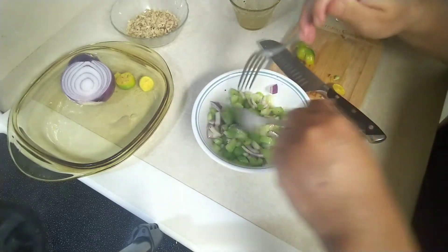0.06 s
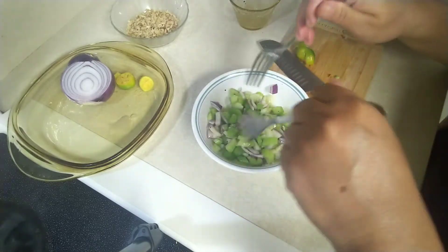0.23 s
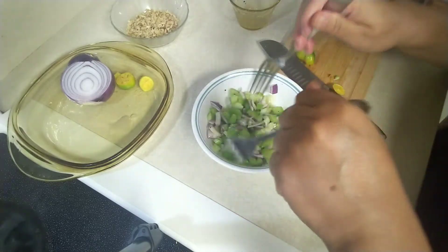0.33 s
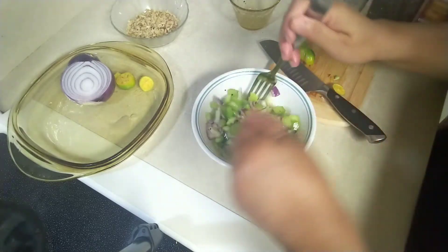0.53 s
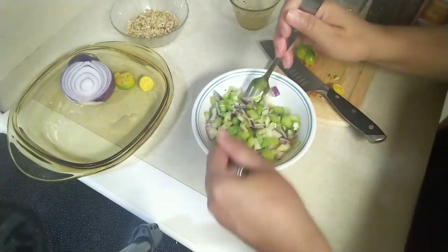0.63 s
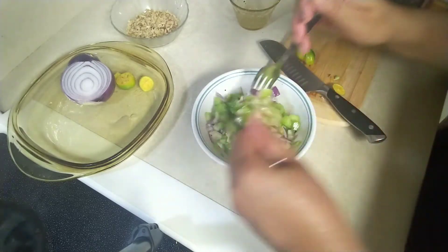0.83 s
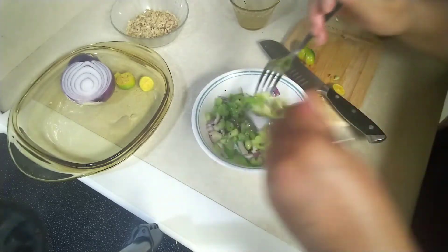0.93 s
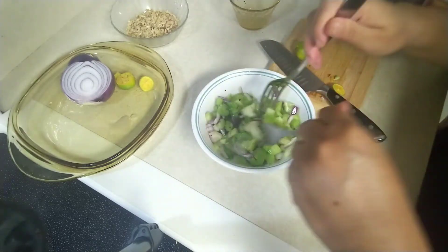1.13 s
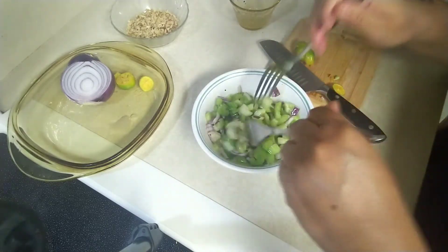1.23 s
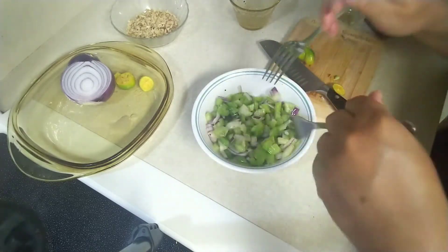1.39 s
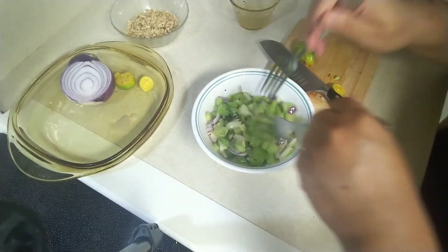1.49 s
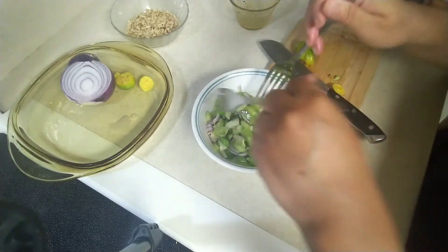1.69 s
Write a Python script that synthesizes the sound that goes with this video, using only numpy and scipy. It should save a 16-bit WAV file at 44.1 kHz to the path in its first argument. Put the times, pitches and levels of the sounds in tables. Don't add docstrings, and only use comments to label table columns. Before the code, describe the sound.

A metal fork tosses chopped vegetables in a ceramic bowl: three quick bright clinks with a brief scrape, then quieter ticks and soft bumps, and one last lighter clink; small kitchen, close stereo microphones, low hum and hiss.

```python
import sys
import numpy as np
from scipy import signal
from scipy.fft import rfft, irfft, next_fast_len
from scipy.io import wavfile
from scipy.ndimage import uniform_filter1d

SR = 44100
rng = np.random.default_rng(int(sys.argv[2]) if len(sys.argv) > 2 else 0)


def rack_gain(trim_db):
    fader = np.asarray(trim_db, float)
    return 10 ** (fader / 20)


def transcribe(u):
    v = np.clip(np.atleast_2d(u).T, -1, 1)
    q = np.round(v * 32767).astype(np.int16)
    wavfile.write(sys.argv[1], SR, q)


N = 77175


def clinks():
    # t/s, peak level/dB, rattle level/dB, rattle length [factor]
    clink_table = [
        (0.231, -9, -8, 0.66),
        (.399, -3, -8.5, 1.4),
        (.4985, -11.5, -11.5, 0.38),
        (1.5044, -15.5, -8.5, 0.62),
    ]
    # f/Hz, level/dB per Hz
    rattle_colour = [(410, -60.5), (700, -41), (1770, -34), (2590, -20), (2840, -34.5), (5400, -11.5),
                     (6480, -11), (9990, -7), (16000, -23)]
    # f/Hz, level/dB, t60/s
    wall_modes = [(1752, -23.5, 0.12), (3258, -22.5, 0.31), (4404, -28, .07), (5430, -11.5, 0.15),
                  (7370, -10, .09), (8450, -26, .1), (10080, 9, .039), (10480, -13, .035),
                  (11780, -8, 0.059), (12090, -21, .15), (12410, 5.5, 0.063), (13160, -13.5, .12),
                  (14200, -14.5, .1), (15360, 0, 0.26)]
    floor_modes = [(1809, -11, 0.21), (2821, -14.5, 0.13), (3253, -13, .14), (5240, -8.5, .06),
                   (7460, -6.5, 0.11), (8180, -14, 0.095), (9800, -7, 0.14), (10330, -1.5, .07),
                   (10560, -2, 0.042), (10740, -1.5, .08), (12160, -3, .08), (12210, -3, 0.069),
                   (12690, -4, 0.23), (15450, -7.5, 0.19)]
    glance_modes = [(4720, -20, 0.065), (6990, -22, 0.082), (7757, -14, 0.046), (8930, -6, 0.059),
                    (10100, -14, 0.066), (10570, -15, 0.065), (11800, -2, .04), (13050, 1, 0.063),
                    (14500, -12, .08), (14630, -7, .1)]
    rim_modes = [(1791, -13, 0.17), (2827, -12.5, 0.094), (4420, -18.5, 0.03), (5216, -7.5, 0.05),
                 (7368, -1.5, 0.064), (8650, -5, 0.034), (9760, -4, 0.051), (10030, 3.5, 0.027),
                 (10740, -2, 0.076), (11660, 0.5, 0.043), (12500, 0.5, 0.056), (13300, -21, .1),
                 (15100, -8, 0.053), (14680, -5, 0.1)]
    # t/s later, level/dB
    later_tines = [
        [(.003, 3.5), (.0085, -4.5), (.0215, -20)],
        [(.0038, -6), (.0072, -1), (.021, -9.5), (.0365, -13), (.062, -23.5)],
        [(.0033, -3), (.0075, -1.5), (.017, -14.5)],
        [(.003, 0.5), (.008, -4.5), (.019, -10.5)],
    ]
    graze_s, graze_db = .003, -25.5
    split, split_db, split_t60 = .02, -8, .7
    rattle_t60, scatter_db = .092, 6

    out = np.zeros((2, N))
    swarm_hz = rng.uniform(np.sqrt(1400), np.sqrt(15600), size=100) ** 2
    places = (wall_modes, floor_modes, glance_modes, rim_modes)
    for modes, (s, db, rattle_db, length), later in zip(places, clink_table, later_tines):
        main_hz, main_db, main_t60 = np.transpose(modes)
        split_hz = np.repeat(main_hz, 3) * (1 + split * rng.standard_normal(3 * len(modes)))
        swarm_t60 = length * rattle_t60 * rng.uniform(.5, 1.5, len(swarm_hz))
        hz = np.r_[split_hz, swarm_hz]
        t60 = np.r_[split_t60 * np.repeat(main_t60, 3), swarm_t60]
        level = np.r_[np.repeat(main_db, 3) + split_db, along(rattle_colour, swarm_hz) + rattle_db]
        first = [(-graze_s, graze_db), (0, 0)]
        for contacts in (first + list(later[1::2]), later[::2]):
            scatter = scatter_db * rng.standard_normal(len(hz))
            dense = ring(hz, level + scatter + db - 14, t60, .00043, apart(hz))
            bell = ring(main_hz, main_db + db - 15, main_t60, .0003, apart(main_hz), wander=.0000015)
            clink = room(dense + bell)
            for late, loss_db in contacts:
                add(out, s + late, rack_gain(loss_db) * clink)
    return out


def apart(hz):
    return 2.165 * np.clip(hz / 6000, 0, 1)


def ring(hz, db, t60, attack, spread, wander=0):
    t = np.arange(SR // 4) / SR
    lag = 5
    turn = np.c_[spread * rng.uniform(-1, 1, len(hz)) - np.pi * hz * lag / SR]
    shape = rack_gain(np.c_[db] - 60 * t / np.c_[t60]) * (1 - np.exp(-t / attack))
    phase = 2 * np.pi * np.c_[hz] * t
    if wander:
        drift = np.cumsum(rng.standard_normal(phase.shape), axis=1)
        phase = phase + wander * np.c_[hz] * drift
    return np.array([(shape * np.sin(phase + side * turn)).sum(0) for side in (1, -1)])


def scrapes():
    # t/s, rise/s, hold/s, fall/s, level/dB
    strokes = [(0.499, 0.028, 0.1, 0.15, -43), (1.081, 0.02, 0.053, 0.076, -67),
               (1.155, 0.021, 0.027, 0.045, -58), (1.522, 0.011, 0.04, 0.034, -51),
               (0.26, 0.061, .07, .02, -52), (0.402, 0.015, .05, 0.023, -39.5),
               (0.879, 0.041, .12, 0.07, -70.5)]
    # f/Hz, level/dB per Hz
    glaze = [(410, -16), (700, -22.5), (2770, -12), (3460, -12), (5120, -9), (6920, -14), (8100, -10),
             (12800, -4), (16000, -7.5)]
    slips_per_s, slip_spread_db = 2500, 2
    patch_db = 4.5

    t = np.arange(N) / SR
    pressure = np.zeros(N)
    for s, rise, hold, fall, db in strokes:
        corners = np.cumsum([s, rise, hold, fall])
        pressure += rack_gain(db + np.interp(t, corners, [-14.5, 9.0, 5.0, -29], -99, -99))
    slips = (rng.random(N) < slips_per_s / SR) * rack_gain(slip_spread_db * rng.exponential(size=N))
    grit = pair(N, lag=5) * (1 + uniform_filter1d(slips, size=60) * 60 / 12)
    z = signal.stft(grit, nperseg=512)[2]
    patches = uniform_filter1d(rng.standard_normal(z.shape[1:]), size=2, axis=0)
    patches = uniform_filter1d(patches, size=12, axis=1)
    grit = signal.istft(z * rack_gain(patch_db * unit(patches)), nperseg=512)[1][:, :N]
    coloured = filtered(grit, lambda f: rack_gain(along(glaze, f)))
    return room(pressure * unit(coloured))[:, :N]


def ticks():
    # t/s, peak level/dB, centre f/Hz, t60/s
    tick_table = [(.022, -50, 8700, .077), (.023, -55, 1400, .05), (.03, -55, 6000, .04),
                  (.031, -52, 3200, .027), (.073, -37, 12420, .023), (.106, -48, 1836, .059),
                  (.11, -53, 4500, .04), (.112, -44, 10900, .045), (.164, -54, 13200, .04),
                  (.23, -41, 2130, .13), (.399, -43, 854, .1), (.4984, -34, 4700, .07),
                  (.4985, -40, 900, .09), (.4988, -13, 11000, .03), (.501, -41, 1500, .05),
                  (.571, -38, 11500, .04), (.575, -38, 1852, .038), (.578, -54, 800, .16),
                  (.6135, -30, 12800, .03), (.6175, -31, 12700, .03), (.621, -42, 8500, .04),
                  (.752, -53, 11000, .078), (.941, -48, 11140, .07), (.997, -55, 1010, .04),
                  (1.091, -52, 12000, .04), (1.135, -51, 1200, .04), (1.152, -48, 12040, .052),
                  (1.18, -61, 2720, .15), (1.344, -49, 12500, .03), (1.469, -41.5, 10000, .059),
                  (1.47, -58, 2570, .12), (1.498, -43, 11100, .062), (1.503, -34, 2500, .059)]
    width, rise_s = .55, .0006
    out, t = np.zeros((2, N)), np.arange(SR // 8) / SR
    for s, db, hz, t60 in tick_table:
        band = lambda f: 1 / (1 + ((f * f - hz * hz) / (f * hz * width + 1)) ** 2)
        noise = pair(len(t), lag=3, alike=.8 - np.clip(2 * hz / 6000, 0, 1))
        envelope = rack_gain(db - 60 * t / t60) * (1 - np.exp(-t / rise_s))
        add(out, s, room(unit(filtered(noise, band)) * envelope))
    return out


def squeak():
    s, length_s, from_hz, to_hz, db = .31, .08, 1760, 1480, -62
    u, out = np.linspace(0, 1, int(length_s * SR)), np.zeros((2, N))
    phase = 2 * np.pi * np.cumsum(from_hz + (to_hz - from_hz) * u) / SR
    tone = rack_gain(db) * np.sin(np.pi * u) * np.sin(phase)
    add(out, s, room(np.array([tone, tone])))
    return out


def thuds():
    # t/s, counter level/dB, knock level/dB
    thud_table = [(0.023, -47.5, -52.5), (0.099, -49.5, -108), (0.231, -42, -45.5), (0.401, -45.5, -34),
                  (0.479, -44.5, -73), (0.499, -39, -50), (0.524, -36.5, -34.5), (0.574, -45, -40),
                  (0.608, -48, -67), (0.66, -52.5, -67), (0.898, -51.5, -52.5), (0.924, -53, -52),
                  (0.968, -53, -72), (1.025, -51.5, -66), (1.093, -54.5, -60), (1.134, -48, -44.5),
                  (1.17, -54, -55), (1.412, -63, -56), (1.47, -57, -56), (1.502, -43.5, -45.5),
                  (1.554, -47, -89)]
    # t/s, level/dB
    rocks = [
        (.021, -44),
        (1.09, -55.5),
        (1.134, -46),
        (1.41, -61.5),
    ]
    # f/Hz, level/dB, t60/s
    counter = [(62.4, -8, 0.19), (107.65, 6, 0.18), (160.3, 2.5, 0.14), (259.5, -4.5, 0.17),
               (290, -8.5, 0.13)]
    knock = [(298.5, -2, 0.083), (506, -6.5, 0.044)]
    foot = [(465, -3, 0.029), (667.5, -5.5, 0.23), (883, -1, 0.024)]
    side_db, scatter_db = -11.5, 1.2

    # t/s, level/dB, modes, attack/s, detuning share
    pushes = [(s, db, counter, .003, .03) for s, db, _ in thud_table]
    pushes += [(s, db, knock, .001, .12) for s, _, db in thud_table]
    pushes += [(s, db, foot, .001, 0) for s, db in rocks]
    out = np.zeros((2, N))
    for s, db, modes, attack, detune in pushes:
        hz, level, t60 = np.transpose(modes)
        scatter = rng.standard_normal((2, len(hz)))
        spread = rack_gain(side_db) * np.sqrt(hz / 150)
        level = db + level + scatter_db * scatter[1]
        add(out, s, ring(hz * (1 + detune * scatter[0]), level, t60, attack, spread))
    return out


def room(x):
    # f/Hz, t60/s
    decay = [(200, 0.66), (2000, 0.23), (8000, 0.3), (15000, 0.082)]
    wet_db, delay_s = -11, .0048
    hz, t, z = signal.stft(rng.standard_normal((2, SR // 3)), SR, nperseg=256)
    tail = signal.istft(z * rack_gain(-60 * t / along(decay, hz)[:, None]), SR, nperseg=256)[1]
    tail = np.pad(tail / np.linalg.norm(tail[0]), ((0, 0), (int(delay_s * SR), 0)))
    wet = rack_gain(wet_db) * signal.fftconvolve(x[:1], tail, axes=1)
    wet[:, :x.shape[1]] += x
    return wet


def hiss():
    # f/Hz, level/dB per Hz
    hum_colour = [(18, -41.5), (30, -18), (76, 1), (178, -9.5), (226, -21.5), (276, -17.5), (467, -22.5),
                  (600, -25), (780, -52), (1320, -120)]
    hiss_colour = [(350, -39.5), (600, 1), (966, -9), (2070, -5), (2610, -4.5), (4140, -8), (10000, -8),
                   (13900, 0.5), (15500, -6.5)]
    # f/Hz, left-right likeness [correlation]
    likeness = [(60, 0.9), (240, 0.82), (950, 0.09), (3770, 0.01), (15000, 0.01)]
    turn = lambda f: np.arccos(np.clip(along(likeness, f), -1, 1)) / 2
    end = [(22000, -120)]
    hum_curve = list(hum_colour) + end
    hiss_curve = [(1, -120)] + list(hiss_colour) + end
    out = np.zeros((2, N))
    for curve, db in ((hum_curve, -60), (hiss_curve, -63.5)):
        colour = lambda f: rack_gain(along(curve, f)) * np.array([np.cos(turn(f)), np.sin(turn(f))])
        mid, side = filtered(rng.standard_normal((2, N)), colour)
        out += rack_gain(db) * unit(np.array([mid + side, mid - side]))
    return out


def unit(x):
    return x / np.sqrt(np.mean(x ** 2) + 1e-20)


def along(points, hz):
    f, v = np.transpose(points)
    return np.interp(np.log(hz + 1), np.log(f + 1), v)


def filtered(x, response):
    n = x.shape[-1]
    m = next_fast_len(n + 8192)
    return irfft(rfft(x, m) * response(np.fft.rfftfreq(m, 1 / SR)), m)[..., :n]


def add(track, s, sound):
    i = int(round(s * SR))
    track[:, i:i + sound.shape[1]] += sound[:, :N - i]


def pair(size, lag, alike=-.2):
    a, b = rng.standard_normal((2, size))
    return np.array([np.roll(a, lag), alike * a + np.sqrt(1 - min(alike ** 2, 1)) * b])


def scene():
    # f/Hz, width/Hz, level/dB
    notch_table = [
        (6300, 450, -14),
        (8300, 250, -5),
        (14000, 350, -8),
    ]
    notches = lambda f: rack_gain(sum(db * np.exp(-((f - hz) / width) ** 2) for hz, width, db in notch_table))
    return filtered(clinks() + scrapes(), notches) + ticks() + squeak() + thuds() + hiss()


def gate(x):
    shut_share, first_band, attack_db = .25, 12, 5
    z = signal.stft(x, SR, nperseg=2048)[2]
    power = uniform_filter1d(np.abs(z.mean(0)) ** 2, size=4, axis=1)
    power = power[:720].reshape(72, 10, -1).mean(1)
    under = np.log(power / uniform_filter1d(power, size=9, axis=0) + 1e-9)[first_band:]
    total = (np.abs(z[:, 100:]) ** 2).sum((0, 1))
    rising = total > rack_gain(2 * attack_db) * np.roll(total, 1)
    weak = under < np.quantile(under, shut_share, axis=0)
    shut = weak & ~(rising | np.roll(rising, 1))
    z[:, 10 * first_band:720] *= 1 - np.repeat(shut, 10, axis=0)
    return signal.istft(z, SR, nperseg=2048)[1][:, :N]


def low_pass(x):
    return signal.sosfilt(signal.butter(12, 16620, fs=SR, output="sos"), x)


def record(dry):
    low_cut_hz, top_hz = 42, 15900
    low_cut = lambda f: (1j * f / (low_cut_hz + 1j * f)) ** 3
    colour = lambda f: np.clip((top_hz - f) / 400, 0, 1) ** 2 * low_cut(f)
    return low_pass(gate(filtered(dry, colour)))


dry = scene()
out = record(dry)
transcribe(out)
```